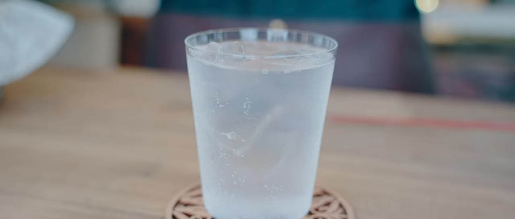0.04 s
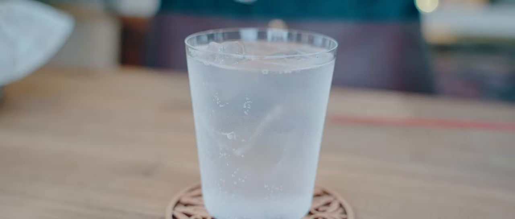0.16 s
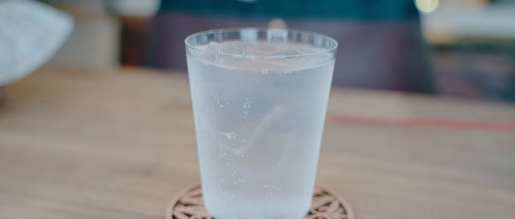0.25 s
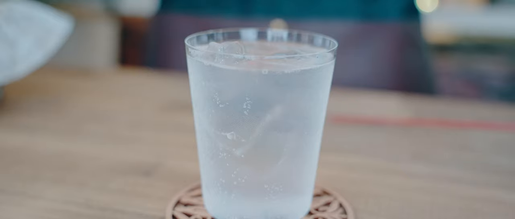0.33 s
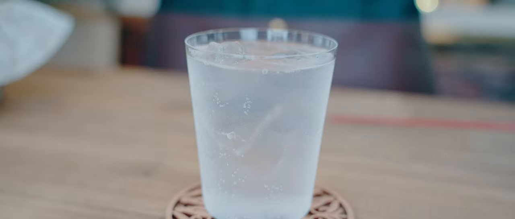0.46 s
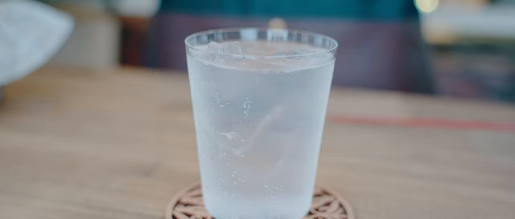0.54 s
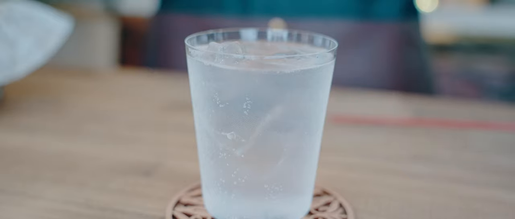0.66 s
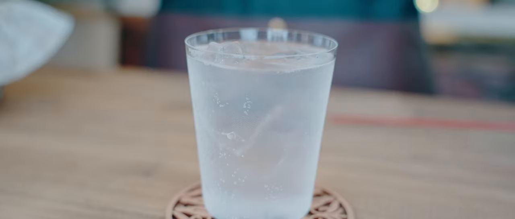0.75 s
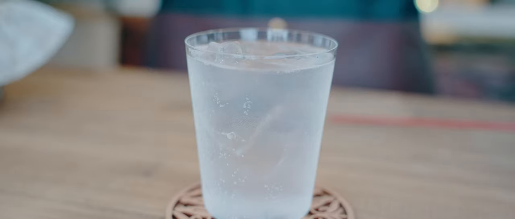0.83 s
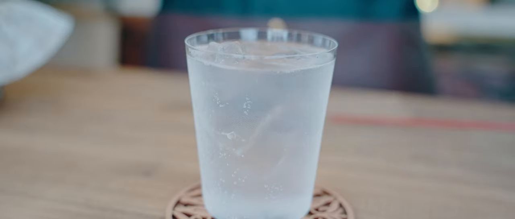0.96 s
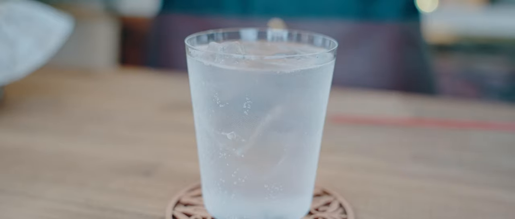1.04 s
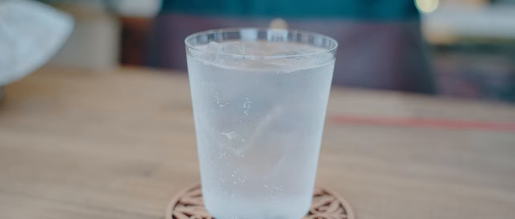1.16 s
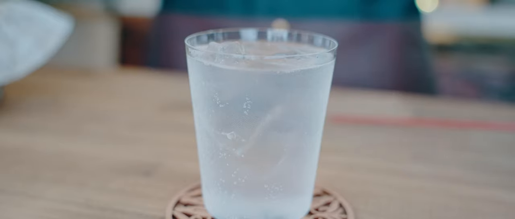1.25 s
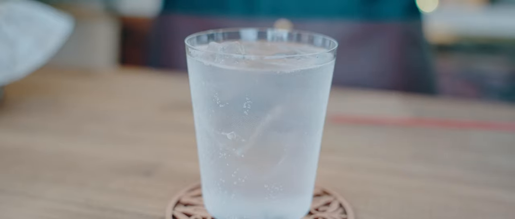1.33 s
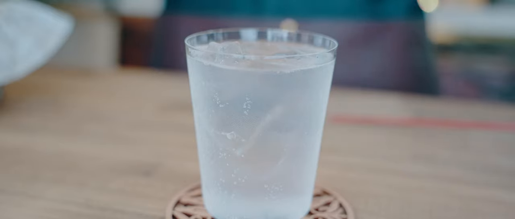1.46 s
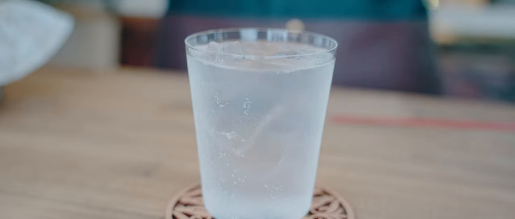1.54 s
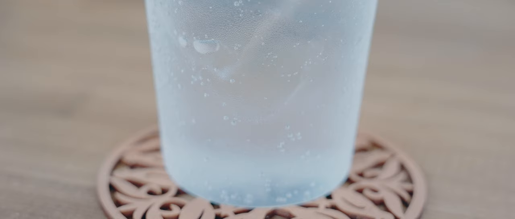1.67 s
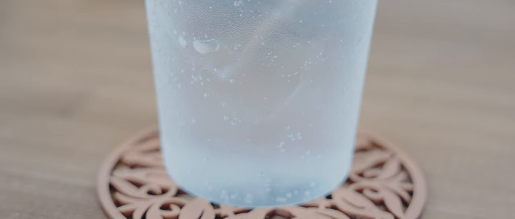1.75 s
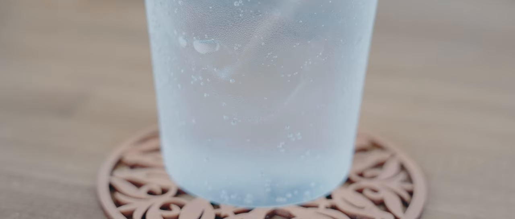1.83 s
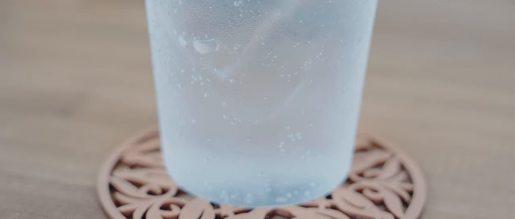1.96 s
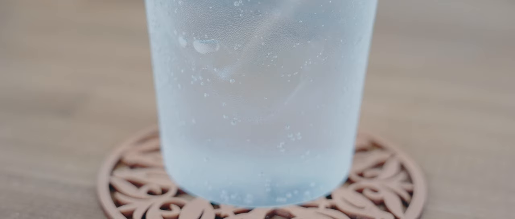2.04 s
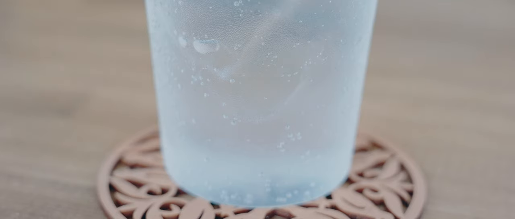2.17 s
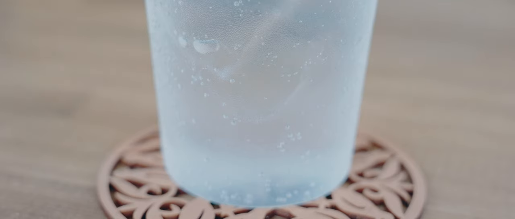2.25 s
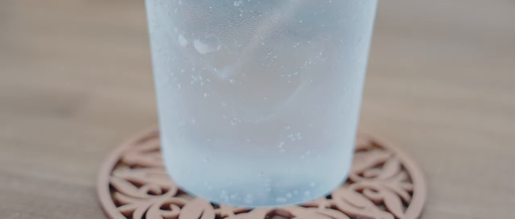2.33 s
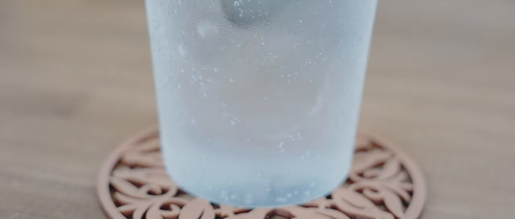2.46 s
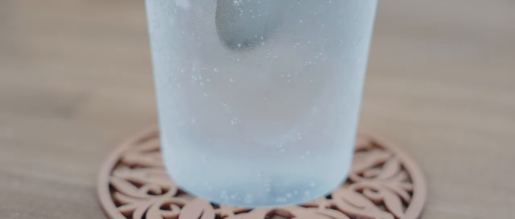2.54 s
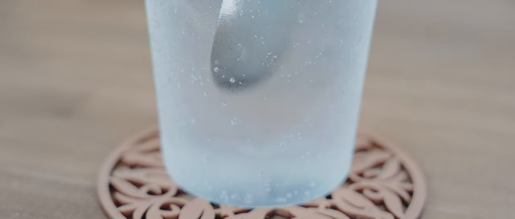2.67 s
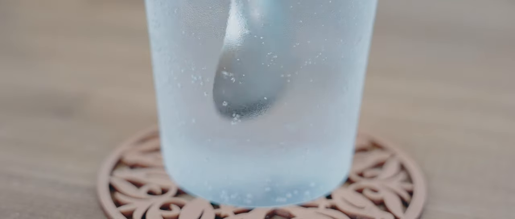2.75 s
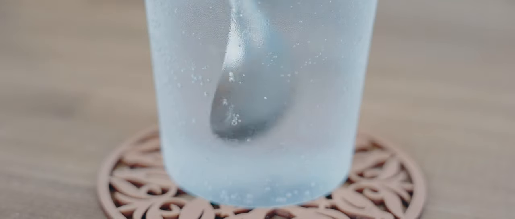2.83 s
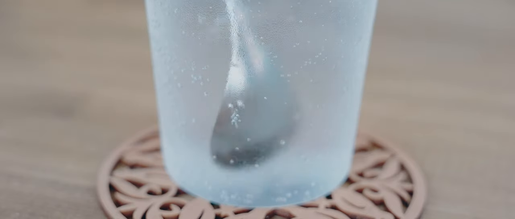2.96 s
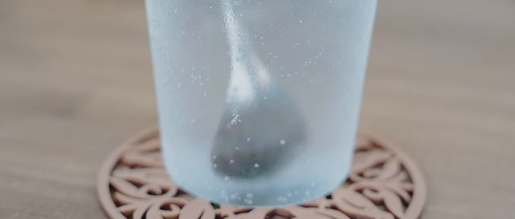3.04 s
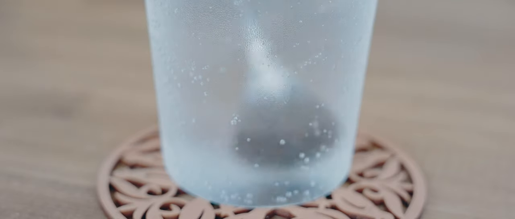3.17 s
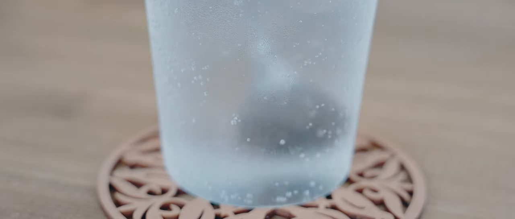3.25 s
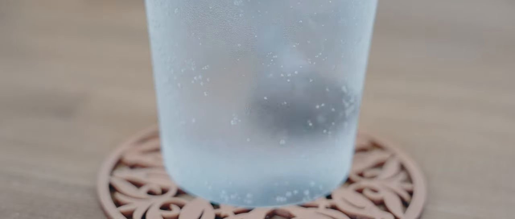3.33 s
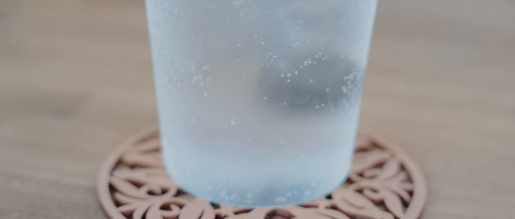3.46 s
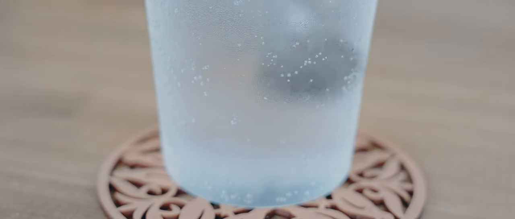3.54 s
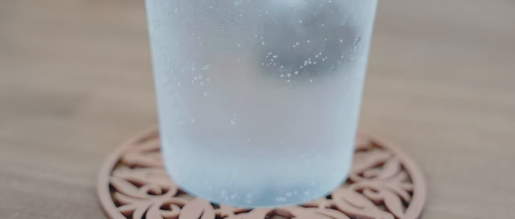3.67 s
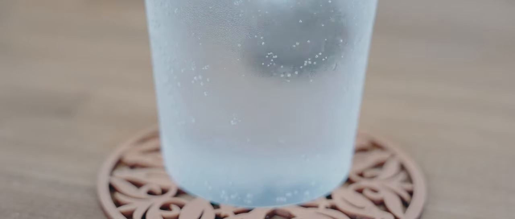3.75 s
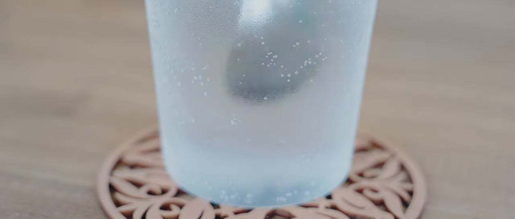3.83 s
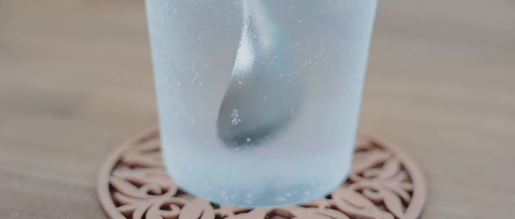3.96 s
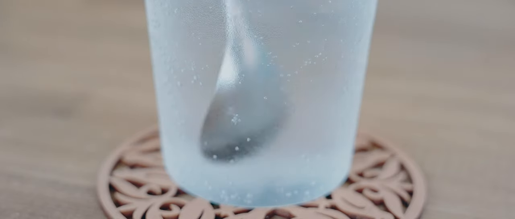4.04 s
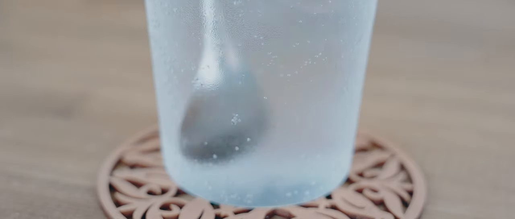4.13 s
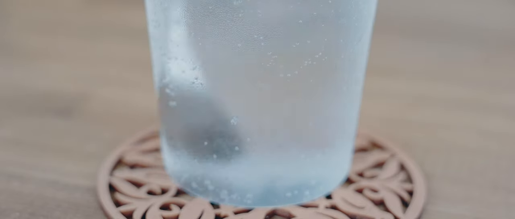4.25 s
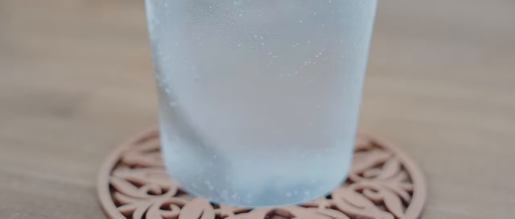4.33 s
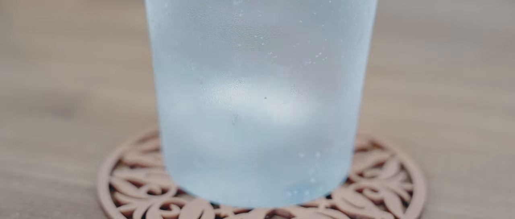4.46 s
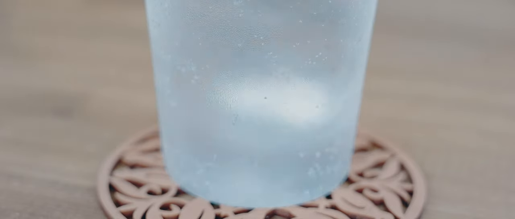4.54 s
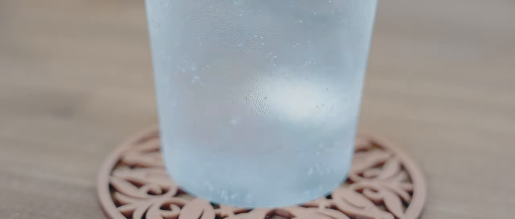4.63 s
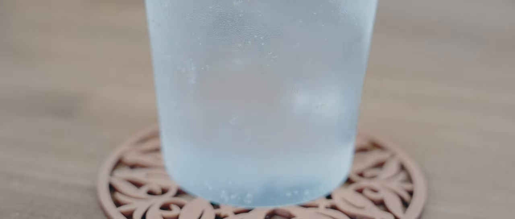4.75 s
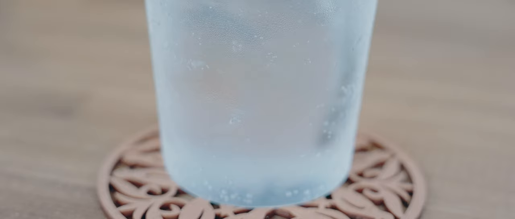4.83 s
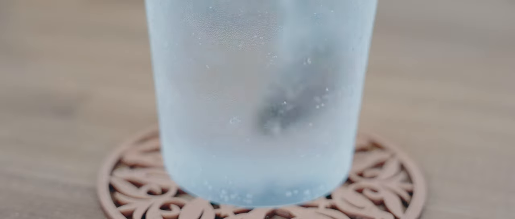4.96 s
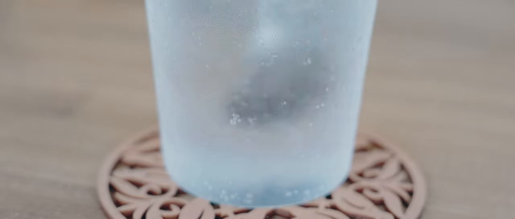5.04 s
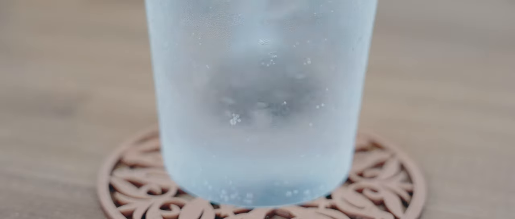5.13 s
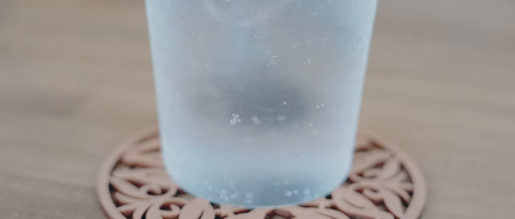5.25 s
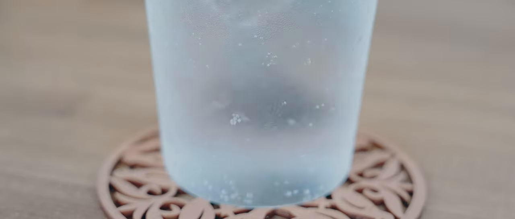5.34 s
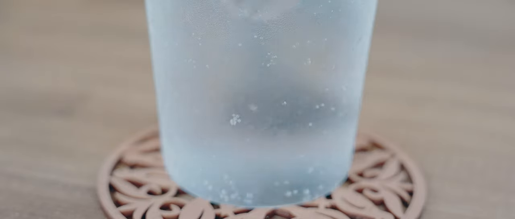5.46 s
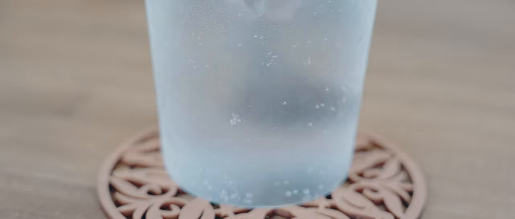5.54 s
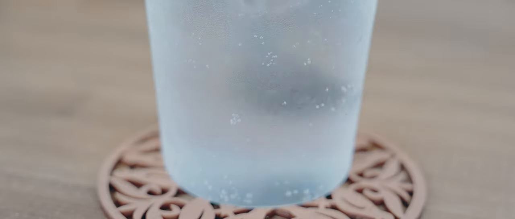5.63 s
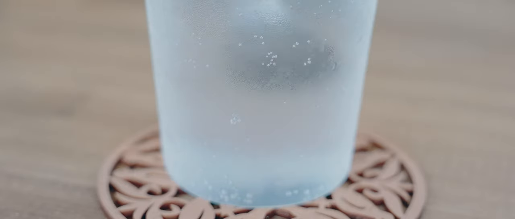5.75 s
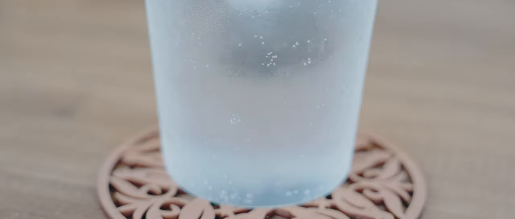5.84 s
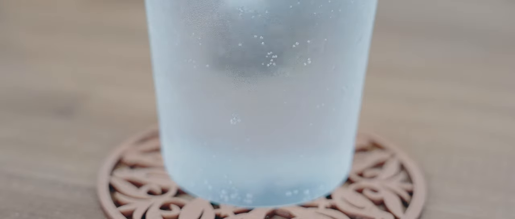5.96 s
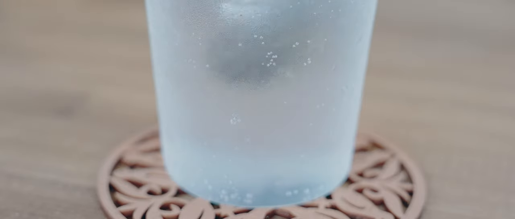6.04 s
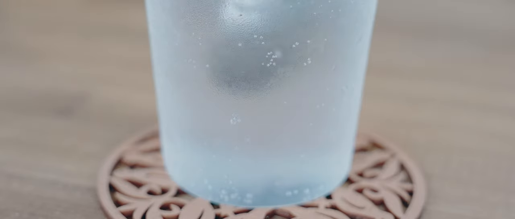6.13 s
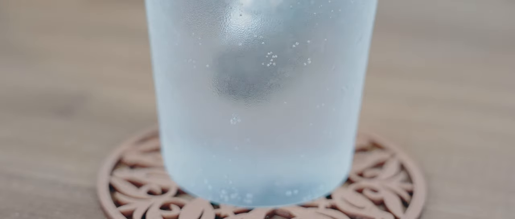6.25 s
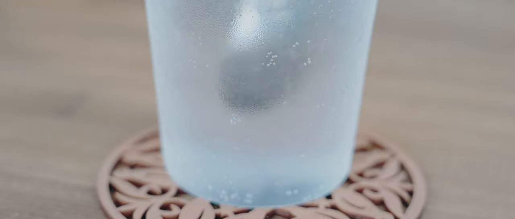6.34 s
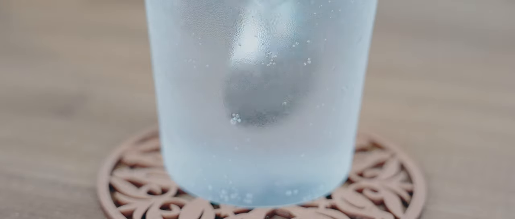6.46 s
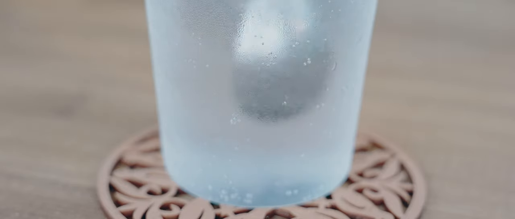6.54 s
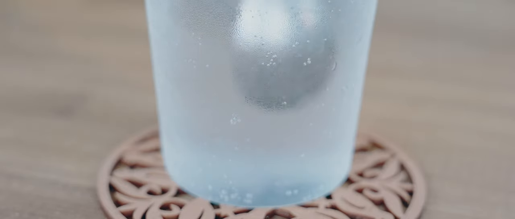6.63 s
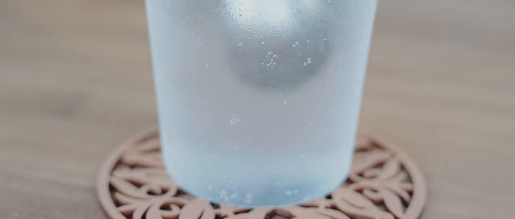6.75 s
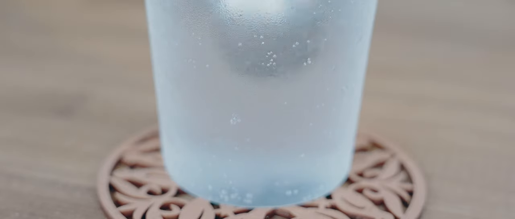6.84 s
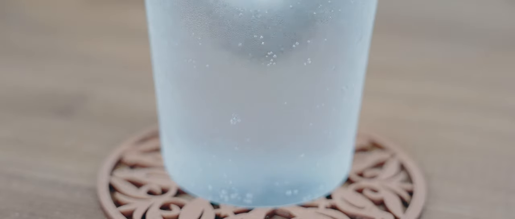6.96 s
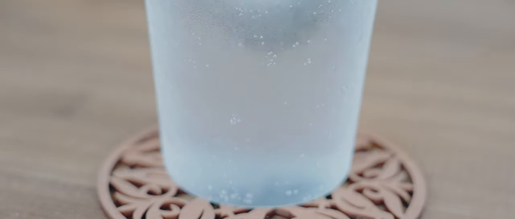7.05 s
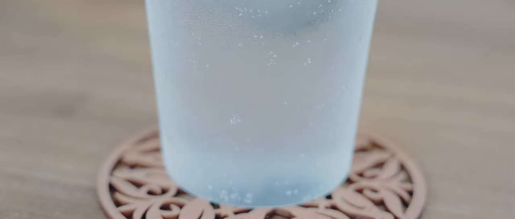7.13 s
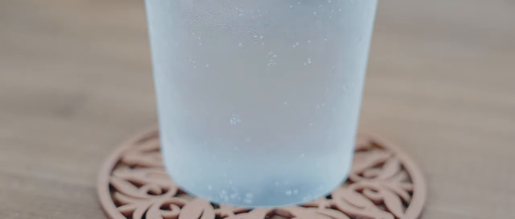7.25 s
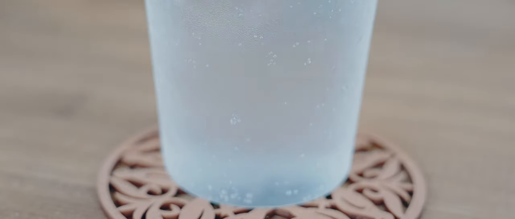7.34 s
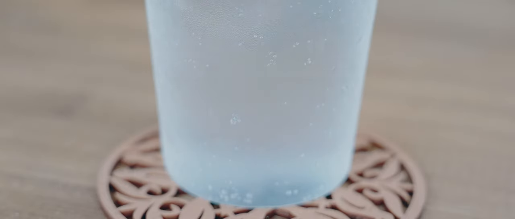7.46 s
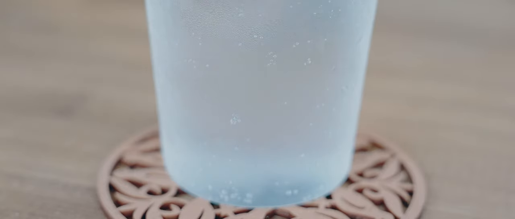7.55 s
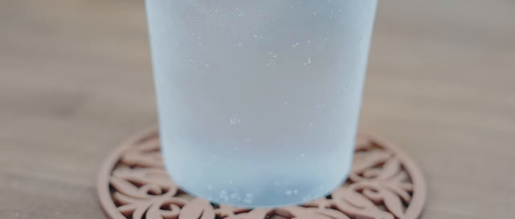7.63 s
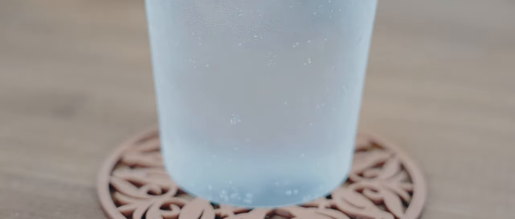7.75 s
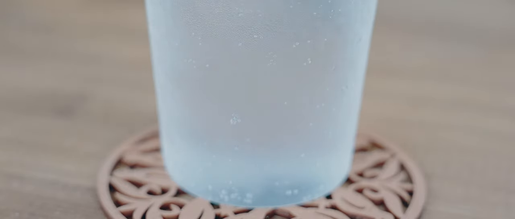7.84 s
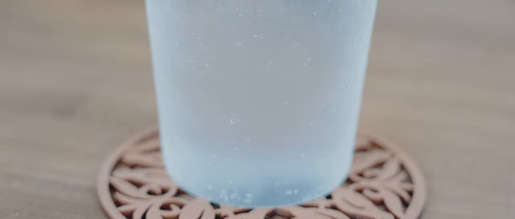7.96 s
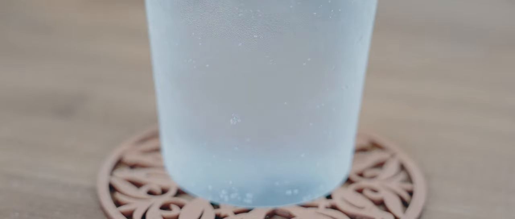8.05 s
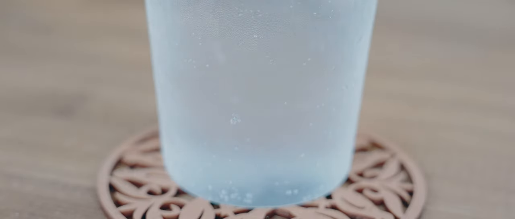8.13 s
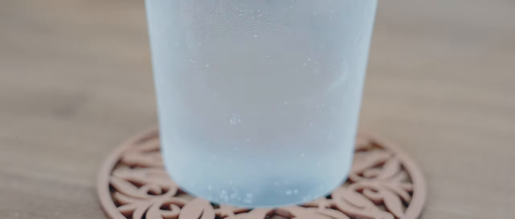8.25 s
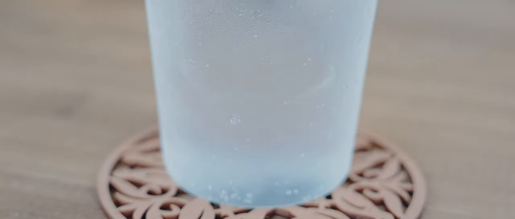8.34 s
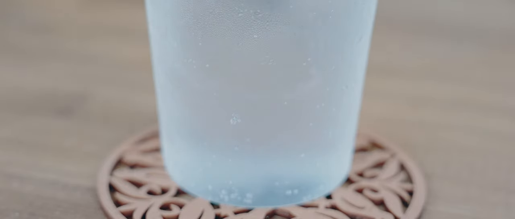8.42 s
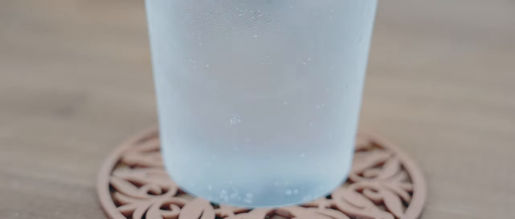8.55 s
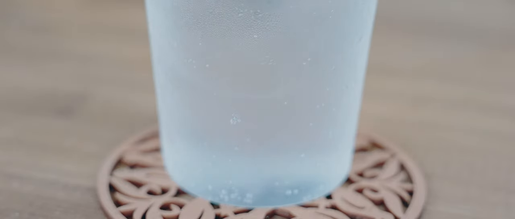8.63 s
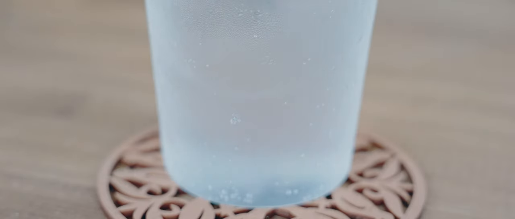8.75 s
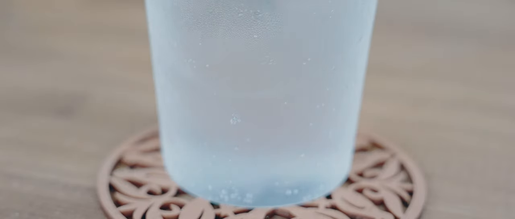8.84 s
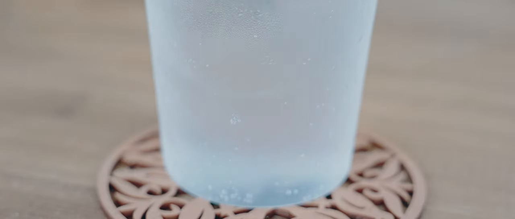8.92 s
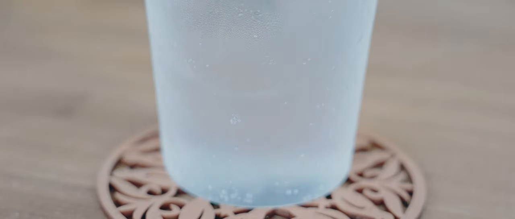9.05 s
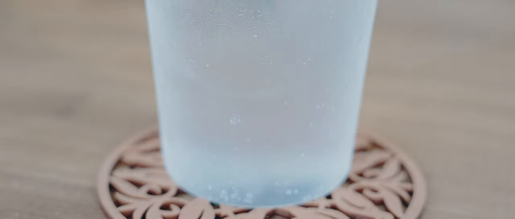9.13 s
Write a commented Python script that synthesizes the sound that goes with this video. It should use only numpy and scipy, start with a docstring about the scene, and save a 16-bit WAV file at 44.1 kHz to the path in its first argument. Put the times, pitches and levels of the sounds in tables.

```python
"""Over quiet room air and low rumble, ice in a tumbler of fizzy drink first cracks and slides: struck
resonances and grainy noise. From 2.3 s a spoon stirs: cubes knock (noise blows through resonances), knock
softly in the rising pitch of the hollow and grind (random friction jerks), the tumbler thuds on its table
(damped low swings), bubbles chirp (rising sines) and tiny ones burst (short pings). The swirl then dies away."""
import sys
import numpy as np
from scipy import signal
from scipy.io import wavfile

SR = 44100
rng = np.random.default_rng(int(sys.argv[2]) if len(sys.argv) > 2 else 0)


def transcribe(u):
    """Save the signal u as a 16-bit wav file named by the first command-line argument.

    u: samples, shape (n,) or (channels, n), limited to [-1, 1]; the rate is SR.
    q: integer samples, one column per channel.
    """
    v = np.clip(np.atleast_2d(u).T, -1, 1)
    q = np.round(v * 32767).astype(np.int16)
    wavfile.write(sys.argv[1], SR, q)


N = 405279
TIME = np.arange(N) / SR
EDGE_HZ = 16150

# modes of the hollow between ice, liquid and wall: (multiple of its pitch, relative level [dB])
HOLLOW_MODES = [(1, 2.5), (1.28, -7.5), (1.48, -3)]
# colour of the filled tumbler: (frequency [Hz], gain [dB])
TUMBLER_COLOUR = [(100, -16.5), (450, -23), (680, -6.5), (1000, -3.5), (2400, -0.5), (3200, 2.5),
                  (5000, -5.5), (5900, -9), (16000, -34)]
# colour of a snap in ice: (frequency [Hz], gain [dB])
SNAP_COLOUR = [(700, -18.5), (4700, -2), (5900, -5), (7100, 0.5), (9200, -7.5), (12000, -12),
               (16000, -21.5)]
# colour of the table under the tumbler: (frequency [Hz], gain [dB])
TABLE_COLOUR = [(20, -13.5), (100, -3.5), (165, -0.5), (250, -8), (700, -28), (3000, -64.5)]


def amp(db):
    """Amplitude of a level in dB."""
    return 10 ** (np.asarray(db) / 20)


def unit(x):
    """Scales to rms 1."""
    return x / np.sqrt(np.mean(x ** 2) + 1e-20)


def blow(x):
    """Scales a hit so that its first 8 ms have rms 1."""
    return x / np.sqrt(np.mean(x[:, :SR // 125] ** 2))


def read(points, hz):
    """Reads a table on a log-frequency axis."""
    f, value = np.transpose(points)
    return np.interp(np.log(hz + 1), np.log(f + 1), value)


def curve(points):
    """Reads a table at every sample."""
    return np.interp(TIME, *np.transpose(points))


def add(mix, start_s, sound):
    """Adds a sound to the mix in place, cut off at the end."""
    part = mix[:, max(round(start_s * SR), 0):][:, :sound.shape[-1]]
    part += sound[..., :part.shape[1]]


def pair(size, apart):
    """Two channels of noise: a shared part plus an opposed part of size apart."""
    mid, side = rng.standard_normal((2, size))
    return np.array([mid + apart * side, mid - apart * side])


def response(points, size=4096):
    """Causal (minimum-phase) impulse response with the given spectrum."""
    log_gain = np.log(amp(read(points, abs(np.fft.fftfreq(size, 1 / SR)))))
    spectrum = np.exp(np.conj(signal.hilbert(log_gain)))
    return np.fft.ifft(spectrum).real[None, :size // 2]


def colour(x, taps):
    """Convolves, keeping the length."""
    return signal.oaconvolve(x, taps, axes=1)[:, :x.shape[1]]


def resonate(x, hz, width_hz):
    """A resonance of gain 1 that can follow a pitch curve: shift to 0 Hz, low-pass, shift back."""
    turn = np.exp(2j * np.pi * np.cumsum(hz * np.ones(x.shape[1])) / SR)
    r = np.exp(-np.pi * width_hz / SR)
    smooth = signal.lfilter([1 - r], [1, -r], x / turn + 1e-18)
    return 2 * (turn * smooth).real


def lumpy(size, depth_db):
    """A gain that wanders between random values 100 samples apart, like a chattering contact."""
    steps = np.clip(rng.standard_normal(size // 100 + 2), -2, 2)
    return amp(depth_db * np.interp(np.arange(size) / 100, np.arange(len(steps)), steps))


def ping(t, hz, cycles):
    """A damped swing with a soft start; cycles is its decay constant in periods."""
    return np.sin(2 * np.pi * hz * t) * np.exp(-t * hz / cycles) * (1 - np.exp(-2 * t * hz))


def blips(per_s, centre_hz, octaves, cycles, spread_db, pan_db):
    """A stream of short pings of very unequal size, scattered round a pitch curve, each at its own place."""
    out, t = np.zeros((2, N)), np.arange(SR // 64) / SR
    at = np.flatnonzero(rng.random(N) < per_s / SR)
    for i, (pitch, damping, size, pan) in zip(at, rng.standard_normal((len(at), 4))):
        hz = min(centre_hz[i] * 2 ** (octaves * pitch), EDGE_HZ)
        gain = amp(spread_db * min(size, 2) + pan_db * np.array([[pan], [-pan]]))
        add(out, i / SR, gain * ping(t, hz, cycles * 2 ** (.5 * damping)))
    return unit(out)


def room(x, stretch=1):
    """A diffuse noise tail, each band dying at its own speed."""
    # decay of the room before stretch: (frequency [Hz], time to fall 60 dB [s])
    decay = [(500, 0.56), (1300, 0.17), (3500, 0.16), (16000, 0.1)]
    hz, t, z = signal.stft(pair(SR // 2, 0.41), SR, nperseg=256)
    t60_s = stretch * read(decay, hz)[:, None]
    onset = 1 - np.exp(-t / 0.01)
    tail = signal.istft(z * amp(-60 * t / t60_s) * onset, SR, nperseg=256)[1]
    return colour(x, tail / np.linalg.norm(tail[0]))


def background():
    """Room air and an unsteady low rumble, both coloured noise."""
    # spectrum of the still air: (frequency [Hz], relative density [dB per Hz])
    air_colour = [(50, -8), (130, -15.5), (330, -18), (1000, -28), (4700, -41.5), (5500, -32), (6300, -43),
                  (11500, -42.5), (16000, -50.5)]
    # low rumble of the room: (time [s], level [dB])
    rumble_level = [(1.3, -63), (1.8, -47.5), (2.3, -49), (8.3, -52)]
    air = amp(-68.5) * unit(colour(pair(N, 0.68), response(air_colour)))
    low = response([(10, 11.0), (22, 4.5), (48, -2.0), (70, -13.5), (130, -34), (400, -67.5)])
    rumble = amp(curve(rumble_level)) * unit(colour(pair(N, 1.0), low))
    return air + rumble


def thuds():
    """Pushes of the spoon reach the table through the tumbler: a few low swings and a dull rumble."""
    # tumbler on the table: (time [s], level [dB], pitch [Hz])
    thud_rows = [(2.332, -33.5, 178.9), (2.695, -27, 165), (2.745, -30, 175), (2.803, -31.5, 181.7),
                 (3.069, -27.5, 155.7), (3.837, -46, 260), (4.283, -32.5, 113), (4.432, -37.5, 202),
                 (5.086, -39.5, 52), (5.727, -37, 154), (7.126, -39.5, 54.4), (8.117, -36.5, 179)]
    out, t = np.zeros((2, N)), np.arange(SR // 4) / SR
    table = response(TABLE_COLOUR)
    for start_s, db, hz in thud_rows:
        rumble = colour(pair(len(t), 0.77) * np.exp(-t / 0.03), table)
        swing = ping(t, hz, 2.2)
        add(out, start_s, amp(db) * (swing + amp(-3.5) * rumble / abs(rumble).max()))
    return out


def fizz():
    """Stirring frees gas, and tiny bubbles burst at the surface as short high pings."""
    gas_db = curve([(2.3, -100), (2.8, -69.5), (5.5, -69), (7.3, -78), (9.1, -87.5)])
    bursts = blips(per_s=280, centre_hz=np.full(N, 7800), octaves=0.55, cycles=2.7, spread_db=6.5, pan_db=9.5)
    return amp(gas_db) * bursts


def bubbles():
    """A freed bubble swells, rings and sweeps up in pitch as it nears the surface."""
    # single ringing bubbles: (time [s], level [dB], starting pitch [Hz], rise [octaves])
    bubble_rows = [(0.943, -59, 815, 0.094), (2.705, -37, 2390, 0.19), (3.035, -39, 1280, 0.066),
                   (3.125, -37.5, 2950, 0.18), (3.966, -44, 848, 0.0093), (4.11, -52, 820, 0.035),
                   (4.333, -51, 800, 0.14), (4.373, -49, 820, 0.055), (5.129, -36.5, 2340, 0.94),
                   (5.159, -49, 3180, 0.19)]
    ring_s, glide_s = 0.0055, 0.01  # time constants of ring and rise
    out, t = np.zeros((2, N)), np.arange(SR // 10) / SR
    climb = 1 - np.exp(-(t / glide_s) ** 2)
    swell = t / ring_s * np.exp(1 - t / ring_s)
    for start_s, db, hz, rise in bubble_rows:
        turns = np.cumsum(hz * 2 ** (rise * climb)) / SR
        add(out, start_s, amp(db) * np.sin(2 * np.pi * turns) * swell)
    return out


def swishes():
    """Wet cubes slide a little: soft, grainy rustles round their own pitch in the mouth of the tumbler."""
    # sliding ice: (time [s], length [s], level [dB], pitch [Hz])
    swish_rows = [(0, 0.11, -67, 2950), (0.125, 0.11, -49, 2130), (0.493, 0.11, -61, 3530),
                  (0.775, 0.12, -66, 2420), (0.903, 0.089, -62, 2070), (1.05, 0.035, -59.5, 5640),
                  (1.112, 0.031, -56, 4330), (1.439, 0.047, -66.5, 3500)]
    # resonances of the mouth of the tumbler: (frequency [Hz], gain [dB])
    mouth_colour = [(400, -10), (1400, -3), (2250, 0.5), (2700, -5.5), (3300, 5), (3800, -3.5), (4500, 2.5),
                    (5600, -11), (7400, 2), (9000, -11), (16000, -20.5)]
    relative_width = 0.9  # bandwidth over pitch
    out, mouth = np.zeros((2, N)), response(mouth_colour)
    for start_s, length_s, db, hz in swish_rows:
        size = int(length_s * SR)
        rub = pair(size, 0.3) * lumpy(size, depth_db=4.0)
        rustle = unit(colour(resonate(rub, hz, relative_width * hz), mouth))
        add(out, start_s, amp(db) * rustle * signal.windows.tukey(size, .5))
    return out + amp(-6.5) * room(out, stretch=2)


def hollow_hz(s):
    """Pitch of the hollow between ice, liquid and wall, which shifts as the cubes are lifted."""
    # (time [s], pitch [Hz])
    pitch_points = [(2.65, 825), (2.8, 1046), (3.8, 1011), (4.35, 840), (5.1, 1510), (5.6, 1690),
                    (6.0, 2066)]
    return np.interp(s, *np.transpose(pitch_points))


def ice_hits(rows, contact_s, ring_db, ring_cycles, hollow_db, rattle_db, rattle_s, apart):
    """A sharp blow and a few small rebounds ring a cube and the hollow; a treble snap rides on the front."""
    rebounds_per_s, clack_width, hollow_cycles = 250, 1.3, 12  # clack_width: bandwidth over pitch
    out, t = np.zeros((2, N)), np.arange(SR // 12) / SR
    tumbler, snap = response(TUMBLER_COLOUR), response(SNAP_COLOUR)
    strike = t == 0
    for start_s, db, hz, snap_db in rows:
        # the cube chatters against its neighbour; hard blows bounce clear and chatter less
        chatter_gain = amp(rattle_db - np.maximum(db + 27.5, -2))
        chatter = chatter_gain * np.exp(-t / rattle_s) * lumpy(len(t), depth_db=5.5)
        force = np.exp(-t / contact_s) + chatter
        contact = pair(len(t), apart) * force + 5 * strike

        width_hz = clack_width * hz
        resonant = resonate(resonate(contact, hz, width_hz), hz, width_hz)
        clack = colour(blow(resonant) + amp(-23.0) * blow(contact), tumbler)

        rebound_size = np.clip(chatter * rng.standard_normal(len(t)), -.5, .5)
        rebounds = rebound_size * (rng.random(len(t)) < rebounds_per_s / SR)

        hollow = np.zeros(len(t))
        for ratio, mode_db in HOLLOW_MODES:
            mode_gain = amp(mode_db) * rng.normal(1, 0.27)
            mode_hz = ratio * hollow_hz(start_s) * rng.normal(1, 0.018)
            hollow += mode_gain * ping(t, mode_hz, hollow_cycles)

        cube = amp(ring_db) * blow(ping(t, hz, ring_cycles)[None])
        ring = cube + amp(hollow_db) * blow(hollow[None])
        body = blow(blow(clack) + colour(ring, (rebounds + strike)[None]))
        crack = blow(colour(pair(len(t), 0.75) * force * np.exp(-t / 0.042), snap))
        add(out, start_s, amp(db) * (body + amp(snap_db) * crack))
    return out


def settling():
    """Ice cracks and settles on its own: soft hits with a weak ring and a room tail."""
    # (time [s], level before the final colour [dB], pitch [Hz], treble snap against the level [dB])
    settling_rows = [(0.1566, -44, 1890, -30), (0.2268, -30.5, 2850, -7), (0.329, -64, 2850, -12),
                     (0.3472, -52.5, 2600, -7), (0.398, -50.5, 2470, -14), (0.7426, -49, 2436, -2.5),
                     (1.1906, -45, 2420, -1.5)]
    hits = ice_hits(settling_rows, contact_s=0.0027, ring_db=-19, ring_cycles=7.6, hollow_db=-25,
                    rattle_db=-23, rattle_s=0.024, apart=0.2)
    treble = response([(8000, 5.0), (11000, -3.5), (16000, -21)])
    return colour(hits + amp(-10.0) * room(hits, stretch=1.4), treble)


def soft_knocks():
    """Further, quieter knocks: each rings a cube just above the pitch of the hollow; higher ones snap brighter."""
    # further knocks, quieter, pitched by the hollow: (time [s], level [dB])
    soft_knock_rows = [(2.354, -39.5), (2.395, -35), (2.472, -51), (2.589, -41), (2.651, -53), (2.914, -33),
                       (2.923, -33.5), (2.941, -37), (3.272, -35), (3.798, -35.5), (4.6307, -42), (4.72, -46),
                       (5.0278, -39.5), (5.239, -51), (5.372, -48.5), (6.023, -36.5), (6.042, -42), (6.1094, -39),
                       (6.2092, -50.5), (6.281, -47), (6.3753, -45.5), (6.4701, -47), (6.5479, -45.5),
                       (6.7235, -41), (6.8248, -49.5), (7.0074, -41.5), (7.1925, -37), (7.3711, -41),
                       (7.622, -49.5), (7.8198, -49), (7.8437, -49), (7.8956, -47.5), (8.0373, -57),
                       (8.0872, -56.5), (8.1186, -44.5), (8.1421, -54), (8.2204, -60), (8.3521, -44),
                       (8.4528, -54.5), (8.535, -51), (8.6743, -62.5)]
    cube_octaves = .25  # scatter of the cubes' own pitch above the hollow
    top_snap_db, snap_db_per_octave = -10, 22  # treble snap of the highest of these knocks, and its fall with pitch
    s, db = np.transpose(soft_knock_rows)
    hz = hollow_hz(s)
    # each cube adds a higher ring of its own
    cube_hz = hz * 2 ** (cube_octaves * np.minimum(rng.exponential(1, len(s)), 2))
    snap_db = top_snap_db + snap_db_per_octave * np.log2(hz / hz.max())
    return ice_hits(zip(s, db, cube_hz, snap_db), contact_s=0.0013, ring_db=3.5, ring_cycles=4.9,
                    hollow_db=-5.5, rattle_db=-8, rattle_s=0.0096, apart=0.38)


def jerks(per_s, spread_db, fade_s):
    """Friction force: sudden slips of very unequal size, each dying quickly."""
    slips = rng.standard_normal(N)
    size = amp(spread_db * np.minimum(slips, 2)) * (rng.random(N) < per_s / SR)
    power = signal.lfilter([1], [1, -np.exp(-2 / (fade_s * SR))], size ** 2)
    return np.sqrt(power + 1e-12)


def effort():
    """Strength of the rubbing: each push grips, sags and lets go, over the gentle rubbing of the swirl."""
    # pushes that drag the cubes along each other and the wall: (time [s], length [s], level [dB])
    stroke_rows = [(2.346, 0.077, -48.5), (2.504, 0.024, -49), (2.685, 0.067, -44.5), (2.908, 0.044, -38),
                   (3.052, 0.28, -39), (3.388, 0.11, -44.5), (3.761, 0.086, -41), (3.886, 0.053, -44.5),
                   (4.281, 0.011, -44), (4.411, 0.017, -42.5), (4.723, 0.098, -47), (4.866, 0.093, -43.5),
                   (5.049, 0.023, -39), (5.47, 0.093, -41), (5.713, 0.27, -33), (6.045, 0.065, -42.5),
                   (6.495, 0.16, -46), (6.736, 0.061, -41.5), (6.934, 0.16, -40.5), (7.122, 0.14, -37.5),
                   (7.781, 0.044, -41.5)]
    # how lively the cubes jostle, dying away once the spoon is out: (time [s], level before rub_db [dB])
    swirl_level = [(2.3, -38.5), (3.25, -70), (3.6, -51.5), (5.0, -39.5), (6.25, -48), (7.15, -46.5),
                   (7.47, -64), (7.9, -54.5), (8.75, -88)]
    swirl_start_s, rub_db = 2.33, -14.5  # rub_db: steady rubbing of floating cubes, against the swirl
    # a push grips fast, eases off, and the cubes coast to rest
    grip_s, sag_db_per_s, release_db_per_s = 0.0046, 14.5, 347.5
    swirl_power = (amp(curve(swirl_level) + rub_db) * (TIME > swirl_start_s)) ** 2
    t = np.arange(SR // 2) / SR
    push_power = np.zeros((1, N))
    for start_s, length_s, db in stroke_rows:
        fade_db = sag_db_per_s * t + release_db_per_s * np.maximum(t - length_s, 0)
        grip = np.minimum(t / grip_s, 1) ** 2
        add(push_power, start_s, (grip * amp(db - fade_db)) ** 2)
    return np.sqrt(swirl_power + push_power)


def grinding():
    """Cubes slip in tiny jerks that ring the hollow, shed grit, churn bubbles and shake the table."""
    # pitch of the grinding, moving as the spoon lifts the cubes: (time [s], pitch [Hz])
    rub_pitch = [(2.3, 1010), (3.2, 1430), (4.3, 1265), (5.1, 1600), (5.9, 3130), (6.4, 2190)]
    hollow_width_hz = 110
    force, hz = jerks(per_s=380, spread_db=11.5, fade_s=0.0044), curve(rub_pitch)
    scrape = pair(N, 0.13) * force
    body = unit(resonate(resonate(scrape, hz, 3200), hz, 3200)) + amp(-8.0) * unit(scrape)
    hollow = sum(amp(db) * resonate(body, ratio * hollow_hz(TIME), hollow_width_hz)
                 for ratio, db in HOLLOW_MODES)
    body = unit(unit(body) + amp(-9.5) * unit(hollow))
    # larger slips each pop at a pitch of their own
    body = body + .8 * blips(per_s=340, centre_hz=hz, octaves=.5, cycles=2.4, spread_db=5, pan_db=1)
    churn = blips(per_s=120, centre_hz=hz, octaves=.3, cycles=6.0, spread_db=4, pan_db=1)
    churn = churn * (hz.min() / hz) ** 2  # wettest while the spoon is deep and the pitch low
    crackle = amp(-2.0) * unit(colour(unit(body) + amp(-6.0) * churn, response(TUMBLER_COLOUR)))
    grit_force = force * lumpy(N, depth_db=2.5)
    grit = amp(-10.0) * unit(colour(pair(N, 1.0) * grit_force, response(SNAP_COLOUR)))
    shake = amp(-15.0) * unit(colour(pair(N, 0.42), response(TABLE_COLOUR)))
    return effort() * (crackle + grit + shake)


def knocks():
    """Stirred cubes knock: short hard contacts with a strong ring and chatter."""
    # (time [s], level [dB], pitch [Hz], treble snap against the level [dB])
    knock_rows = [(2.3323, -34, 982, -14), (2.4416, -44.5, 1860, -6.5), (2.4945, -35, 874, -10),
                  (2.5302, -37, 1410, -14.5), (2.6829, -36, 1790, -6), (2.695, -32.5, 1374, -7.5),
                  (2.7498, -34.5, 1070, -5), (2.802, -19.5, 1235, -13), (2.8624, -26, 1039, -15.5),
                  (2.9892, -34, 1350, -8), (3.0683, -28.5, 2880, -5.5), (3.1134, -30.5, 1227, -31),
                  (3.1451, -32.5, 1024, -21), (3.2473, -37, 3230, -10), (3.3074, -28.5, 1822, -10),
                  (3.3946, -36, 1295, -11.5), (3.4503, -38.5, 1060, -11), (3.5485, -46, 2450, -5),
                  (3.6092, -39.5, 2070, -17), (3.7765, -43, 3280, -13.5), (3.9063, -34, 2920, 3),
                  (4.2057, -39.5, 2780, -13), (4.2863, -35, 1860, -4.5), (4.426, -32.5, 1100, -6.5),
                  (4.7817, -39.5, 2650, -5), (4.9705, -38.5, 1325, -15), (5.0695, -41, 1870, -35),
                  (5.0811, -36, 1486, -23), (5.1245, -36.5, 2680, -17.5), (5.2793, -37, 2020, -2.5),
                  (5.3315, -37, 2420, -16), (5.4522, -33, 1785, -3), (5.494, -38, 2800, -21),
                  (5.5095, -37.5, 3440, -13), (5.6019, -36.5, 2070, -7), (5.7232, -33.5, 1534, -3.5),
                  (5.7606, -27, 2970, -8.5), (5.7994, -23, 3560, -16), (5.8367, -23.5, 3020, -9.5),
                  (5.8592, -32, 2970, -18), (5.8847, -25, 4350, -16.5), (5.9188, -24.5, 3530, -9.5),
                  (5.9721, -21, 2930, -20.5), (5.9952, -36, 3400, 4.5), (6.0846, -35, 2670, -8.5),
                  (6.5056, -42, 2860, -3.5), (6.6188, -29.5, 3320, -7), (6.7418, -35, 2090, -2.5),
                  (6.9215, -34, 3400, -15), (6.9418, -29, 2220, -12), (6.9564, -27.5, 3330, -10.5),
                  (7.0228, -30, 3550, -10), (7.12, -31, 3560, -7), (7.1465, -24.5, 3650, -5.5),
                  (7.2592, -30.5, 3580, -9), (7.3416, -31.5, 2080, -20), (7.6841, -33, 2050, -16),
                  (7.7762, -41, 2480, -6.5), (8.2545, -53, 3360, -3)]
    return ice_hits(knock_rows, contact_s=0.0016, ring_db=0, ring_cycles=7.5, hollow_db=-6,
                    rattle_db=-3, rattle_s=0.0085, apart=0.3)


def scene():
    """Drink with its close room, a touch louder on the first channel, plus table and background."""
    stirring = knocks() + soft_knocks() + grinding() + bubbles() + fizz()
    close_room = amp(-19) * room(stirring)
    drink = settling() + swishes() + stirring + close_room
    return drink * amp([[.4], [-.4]]) + thuds() + background()


def record(dry):
    """Band limit: linear-phase low-pass at EDGE_HZ."""
    low_pass = signal.firwin(511, EDGE_HZ, window=("kaiser", 9), fs=SR)
    return signal.oaconvolve(dry, low_pass[None], "same")


dry = scene()
out = record(dry)
transcribe(out)
```